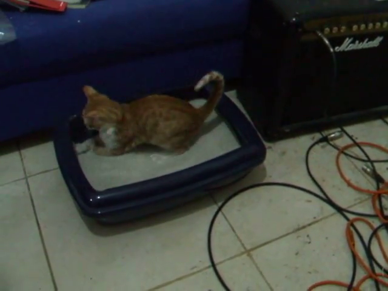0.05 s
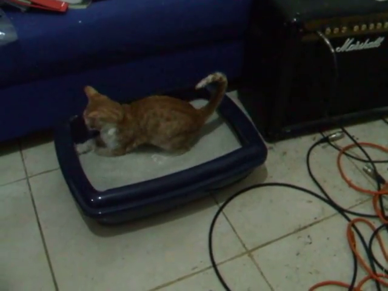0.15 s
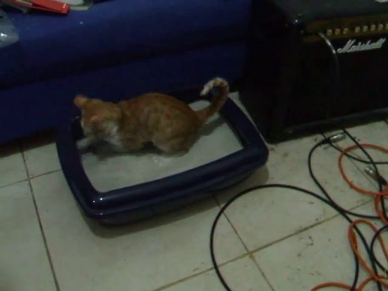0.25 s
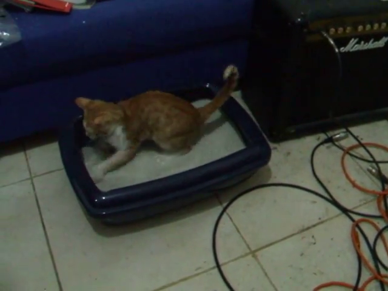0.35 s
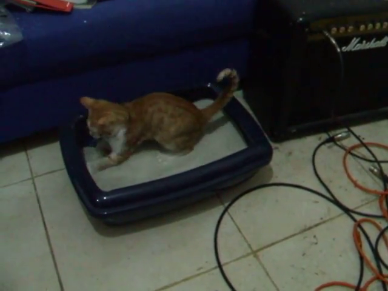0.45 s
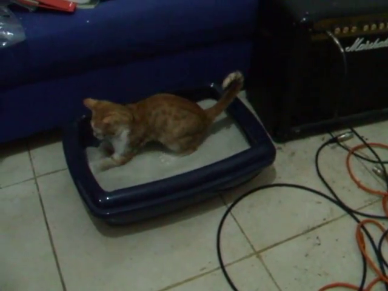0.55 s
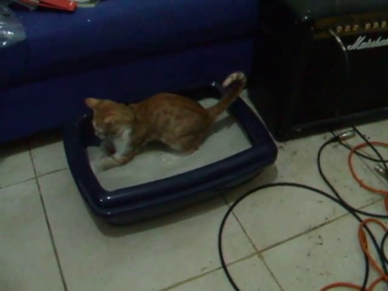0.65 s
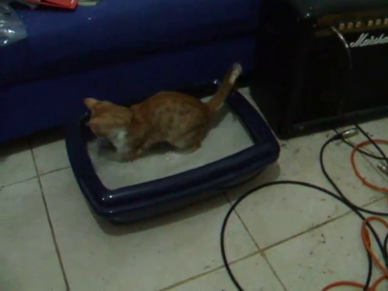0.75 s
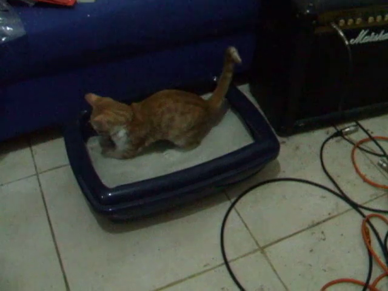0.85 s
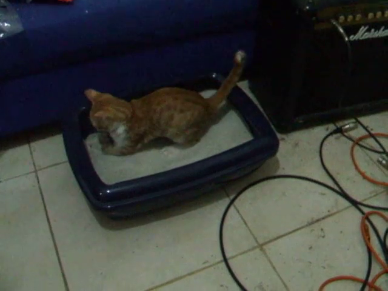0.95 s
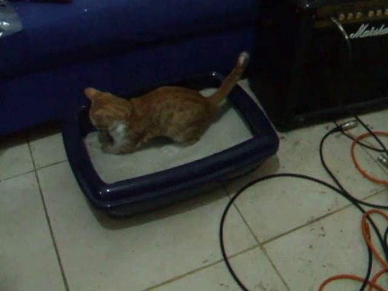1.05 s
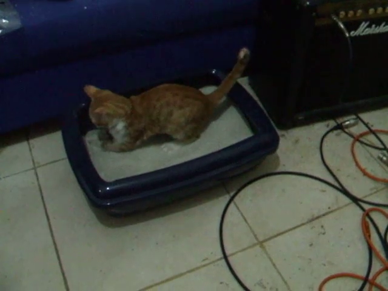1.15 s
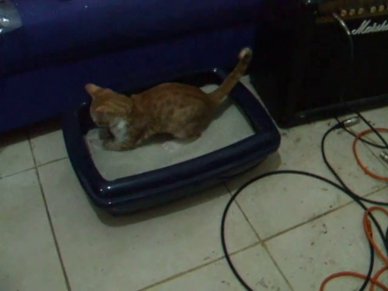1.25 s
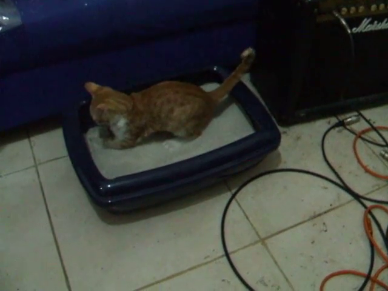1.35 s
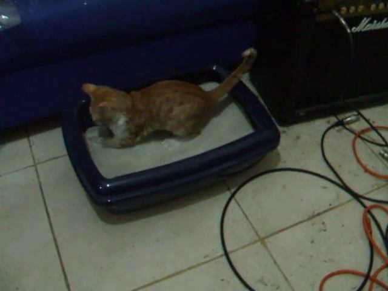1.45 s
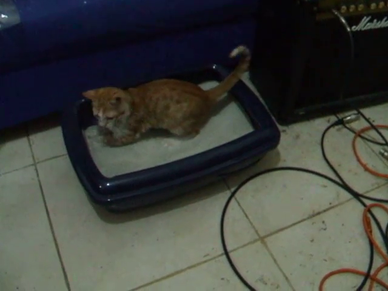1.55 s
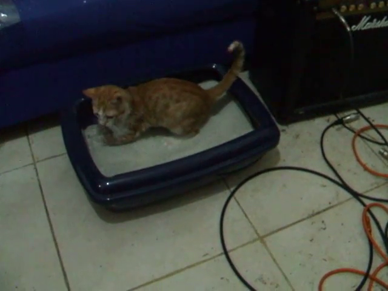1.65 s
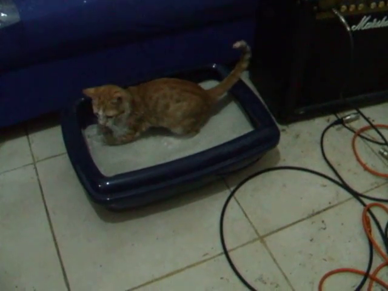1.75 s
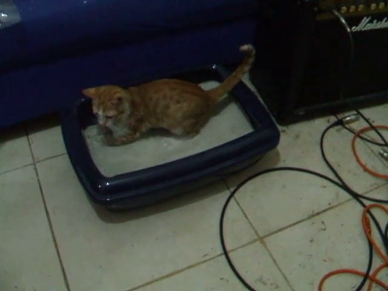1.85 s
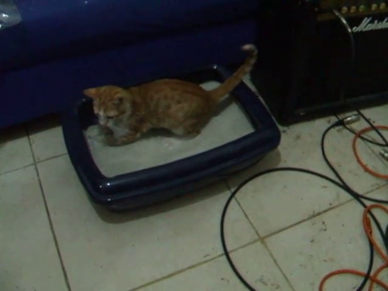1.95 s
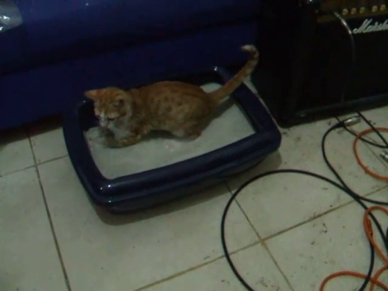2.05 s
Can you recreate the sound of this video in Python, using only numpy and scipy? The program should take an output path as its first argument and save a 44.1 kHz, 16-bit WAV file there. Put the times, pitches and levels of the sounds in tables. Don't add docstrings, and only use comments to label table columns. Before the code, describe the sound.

Litter scratching by small paws: a quick cluster of granular rakes with a dull tray thump, a pause, a brighter plastic clack with scattering grains, later a faint scrape; short indoor reverb, coarse noisy camera sound.

```python
import sys
import numpy as np
from scipy import signal
from scipy.fft import rfft, irfft
from scipy.io import wavfile
from scipy.ndimage import uniform_filter1d

SR = 44100
rng = np.random.default_rng(int(sys.argv[2]) if len(sys.argv) > 2 else 0)


def to_wav(s):
    ch = np.atleast_2d(s).T
    pcm = np.round(np.clip(ch, -1, 1) * 32767)
    wavfile.write(sys.argv[1], SR, pcm.astype(np.int16))


def boost(x):
    u = np.asarray(x, float) / 20
    return 10 ** u


N = 92610
T = np.arange(N) / SR


def curve(table, hz):
    table_hz, table_db = np.array(table, float).T
    return np.interp(np.log(hz), np.log(table_hz), table_db)


def unit(x):
    return x / np.sqrt(np.mean(x ** 2))


def ring(x, hz, t60):
    pole = np.exp(2j * np.pi * hz / SR - np.log(1000) / (t60 * SR))
    return signal.lfilter([1], [1, -pole], x).imag


def walk(rate_hz):
    hold = int(SR / rate_hz)
    levels = np.repeat(rng.standard_normal(N // 20), hold)[:N]
    return unit(uniform_filter1d(levels, hold))


def push(at, db, length):
    u = np.clip((T - at) / length, 0, 1)
    return boost(db) * 2 * np.sin(np.pi * u) ** 2 / (length * SR)


# f/Hz, density/dB
AIR_SPECTRUM = [(30, -23), (90, -14.5), (210, -1.5), (400, -2.5), (750, -5), (1500, -9.5), (4000, -20.5),
                (8000, -19)]


def house_air():
    hz = np.maximum(np.arange(N // 2 + 1) * SR / N, 1)
    noise = rfft(rng.standard_normal(N)) * boost(curve(AIR_SPECTRUM, hz))
    return unit(irfft(noise, N)) * boost(-54 + 0.91 * walk(8.8))


# f/Hz, level/dB, t60/s
HUMS = [(47.74, -65, 2.5), (120.8, -73.5, .5), (194.4, -68, 1.1), (234.6, -68, .7), (697.2, -70, 2.5)]


def appliance_hums():
    return sum(unit(ring(rng.standard_normal(N), hz, t60)) * boost(db) for hz, db, t60 in HUMS)


def camera_whine():
    WHINE_HZ, WHINE_DB = 7867.1, -58.5
    FLIP_HZ, FLIP_SHARPNESS = 14.985, 15
    flip = np.tanh(FLIP_SHARPNESS * np.sin(2 * np.pi * FLIP_HZ * T))
    return flip * np.sin(2 * np.pi * WHINE_HZ * T) * boost(WHINE_DB)


# t/s, rise/s, hold/s, level/dB, depth/dB (extra rumble of the deep litter)
STROKES = [(.1945, .006, .03, -40, -10), (.208, .038, .048, -33.5, -9), (.323, .001, .01, -32, -2),
           (.338, .004, .02, -38, -2), (.3893, .004, .022, -36, -7), (.412, .007, .004, -34, 0),
           (.42, .01, .034, -39.5, 10), (.474, .008, .034, -40, -7), (.53, .01, .03, -47, -8),
           (.575, .02, .04, -51, -6), (.695, .02, .045, -43, 0), (.7503, .0012, .004, -26, 0),
           (.764, .008, .024, -32, 0), (.80, .01, .022, -40, 1), (.845, .01, .025, -49, -4),
           (.93, .004, .022, -53, -6), (1.13, .02, .03, -60, -4), (1.518, .022, .018, -46.5, -8),
           (1.577, .006, .005, -47.5, -8)]


def stroke_effort(deep):
    SETTLE_T60_S = 0.1
    power = 0
    for at, rise, hold, db, depth_db in STROKES:
        u = T - at
        settle = boost(-60 * np.maximum(u - rise - hold, 0) / SETTLE_T60_S)
        shape = np.clip(u / rise, 0, 1) * settle
        power = power + (shape * boost(db + deep * depth_db)) ** 2
    return np.sqrt(power)


# f/Hz, density/dB
GRAIN_SPECTRUM = [(320, -21), (700, -7.5), (1400, -10.5), (2200, -2), (3300, -2), (4800, -4), (6300, -9.5),
                  (8000, -3)]


def litter():
    GRAINS_PER_S, GRAIN_SPREAD_DB, GRAIN_Q = 4500, 2.5, 2.4
    CLUMPS_PER_S, CLUMP_DB = 300, 0.6
    DEEP_BELOW_HZ = 1100
    clump = boost(CLUMP_DB * walk(CLUMPS_PER_S))
    fine, deep = 0, 0
    for hz in 320 * 2 ** (np.arange(15) / 3):
        when, sign = rng.random((2, N))
        size = boost(GRAIN_SPREAD_DB * rng.exponential(size=N))
        clicks = (when < GRAINS_PER_S / SR) * (sign - 0.5) * size
        peak = signal.iirpeak(hz, GRAIN_Q, SR)
        rung = signal.lfilter(*peak, signal.lfilter(*peak, clicks))
        band = unit(rung) * boost(curve(GRAIN_SPECTRUM, hz)) * np.sqrt(hz)
        low = 1 / (1 + (hz / DEEP_BELOW_HZ) ** 4)
        fine = fine + (1 - low) * band
        deep = deep + low * band
    crackle = fine * stroke_effort(0) + deep * stroke_effort(0.84)
    return clump * crackle / np.std(clump * (fine + deep))


def room(x):
    T60_S, LEVEL_DB, TOP_HZ = 0.23, -10.5, 6020
    t = T[:SR // 2]
    onset = np.clip(t / 0.011 - 0.5, 0, 1)
    tail = rng.standard_normal(len(t)) * boost(-60 * t / T60_S) * onset
    tail = signal.lfilter(*signal.butter(1, TOP_HZ, fs=SR), tail)
    tail = tail / np.sqrt(np.sum(tail ** 2))
    return boost(LEVEL_DB) * signal.fftconvolve(x, tail)[:N]


# t/s, level/dB, f/Hz
TICKS = [(0.253, -29.5, 4590), (0.259, -29.5, 5250), (0.29, -20.5, 3240), (0.4204, -20, 4820),
         (0.4221, -27.5, 2890), (0.487, -33, 5060), (0.504, -39.5, 4200), (.746, -39, 4200),
         (0.763, -20.5, 5020), (.7795, -27, 2920), (0.9321, -33.5, 4475), (0.949, -40.5, 5400),
         (1.149, -40, 2790), (1.588, -49, 2500), (0.754, -19, 3390)]


def grain_ticks():
    TICK_T60_S = 0.008
    return sum(ring(push(at, db, 0.5 / hz), hz, TICK_T60_S) for at, db, hz in TICKS)


# t/s, level/dB, contact/s
KNOCKS = [(0.324, -17, .0035), (.409, -30.5, 0.00073), (0.419, -37, 0.00047), (.7513, -24, .0002),
          (.7545, -20, .00022), (0.7527, -15.5, 0.0019), (0.7628, -23, 0.00088), (.776, -29.5, 0.00079),
          (.788, -26, .0015), (.814, -24.5, .002), (.828, -29, .002), (.838, -29, .002),
          (.914, -39.5, 0.0023), (0.429, -35, 0.0013)]
# f/Hz, level/dB, t60/s
TRAY_MODES = [(106, -21.5, 0.023), (206.7, -22.5, .06), (290.8, -8.5, .06), (322.8, -13, 0.064),
              (410.5, -16.5, 0.09), (659, -9.5, 0.027), (1030, -6, 0.018), (1450, -11, 0.012),
              (2128, -2, 0.037), (2500, -13, 0.037), (3160, -20, 0.075), (3580, -7, 0.0084),
              (4200, -0.5, 0.066), (5270, 2, .025)]


def tray_knocks():
    RADIATES_ABOVE_HZ, BENDS_ABOVE_HZ = 210, 500
    force = sum(push(*knock) for knock in KNOCKS)
    force = signal.lfilter(*signal.butter(2, RADIATES_ABOVE_HZ, "high", fs=SR), force)
    out = 0
    for k, (hz, db, t60) in enumerate(TRAY_MODES):
        sign = (-1) ** (k * (hz > BENDS_ABOVE_HZ))
        out = out + sign * boost(db) * ring(force, hz, t60)
    return out


def scene():
    near = litter() + tray_knocks() + grain_ticks()
    wet = near + room(near)
    background = house_air() + appliance_hums() + camera_whine()
    return (wet + background)[None]


def top_cut(x):
    return signal.sosfilt(signal.butter(12, 9320, fs=SR, output="sos"), x)


def record(dry):
    RATE_UP, RATE_DOWN = 160, 441
    STEP, OFFSET_STEPS = 1 / 181, 0.07
    EDGE_HZ, EDGE_WIDTH_HZ, EDGE_SHAPE = 8000, 1186, 5.3
    hz = np.arange(N // 2 + 1) * SR / N
    count = N * RATE_UP // RATE_DOWN
    low = irfft(rfft(dry[0])[:count // 2 + 1], count) * count / N
    steps = STEP * np.floor(low / STEP + OFFSET_STEPS)
    images = np.tile(np.fft.fft(steps), 2)[:len(hz)]
    edge = signal.windows.kaiser(1001, EDGE_SHAPE).cumsum()[::-1]
    edge_hz = EDGE_HZ + EDGE_WIDTH_HZ * np.linspace(-1, 1, len(edge))
    edge = np.interp(hz, edge_hz, edge / edge[0])
    mix = irfft(images * edge, N)[None] * N / count
    return top_cut(mix)


dry = scene()
out = record(dry)
to_wav(out)
```